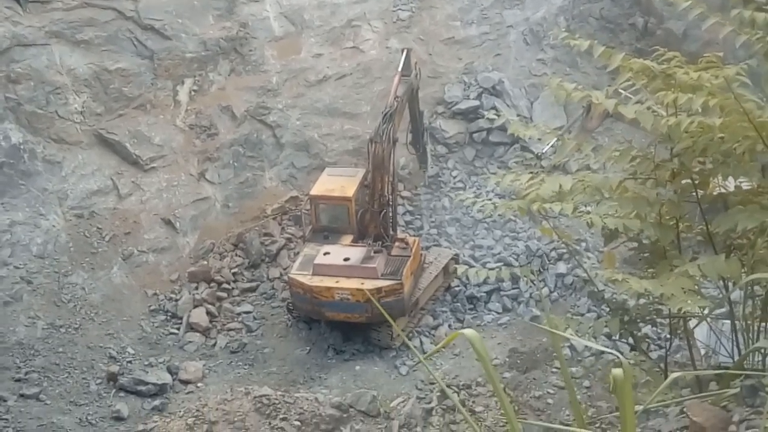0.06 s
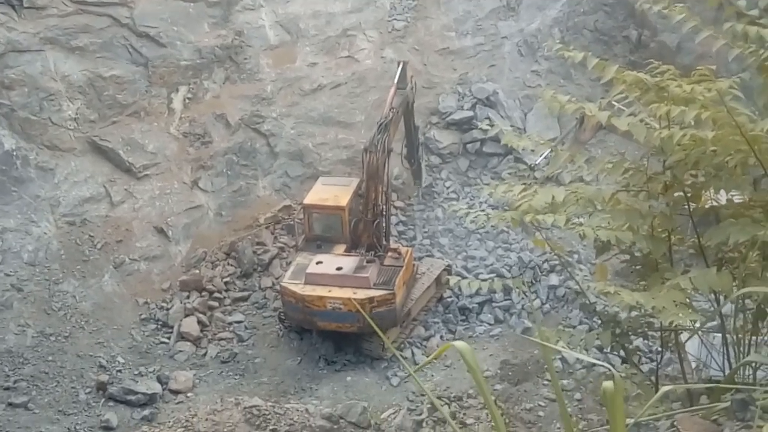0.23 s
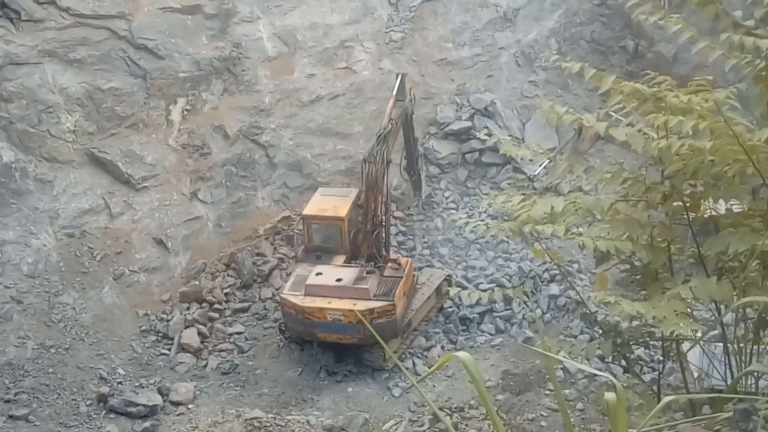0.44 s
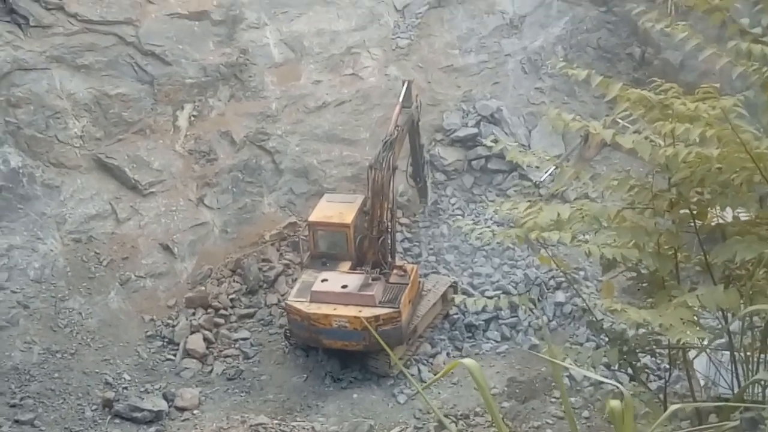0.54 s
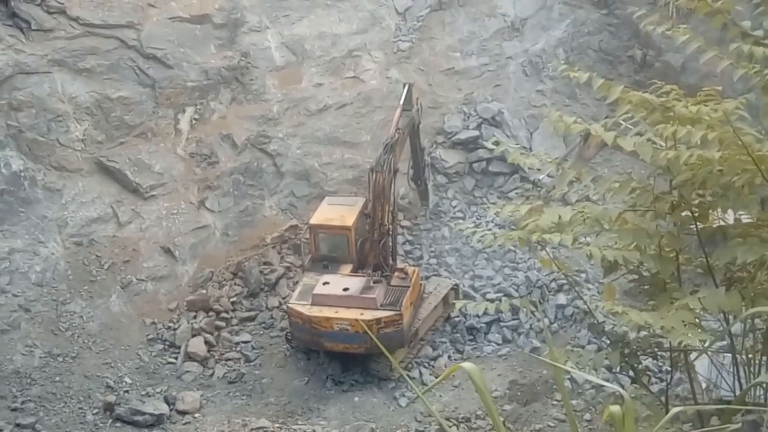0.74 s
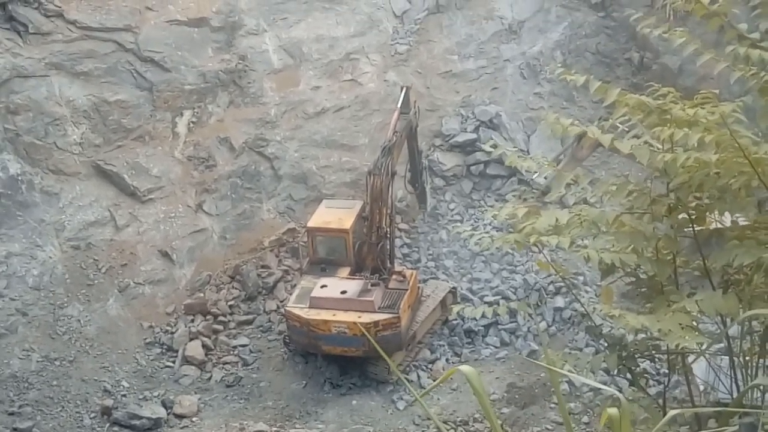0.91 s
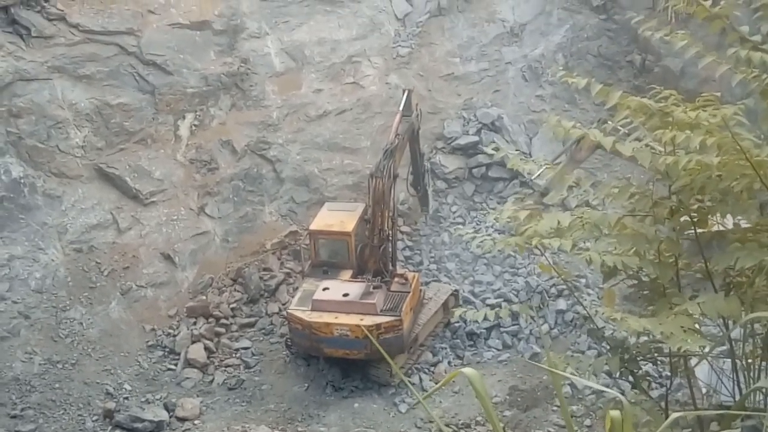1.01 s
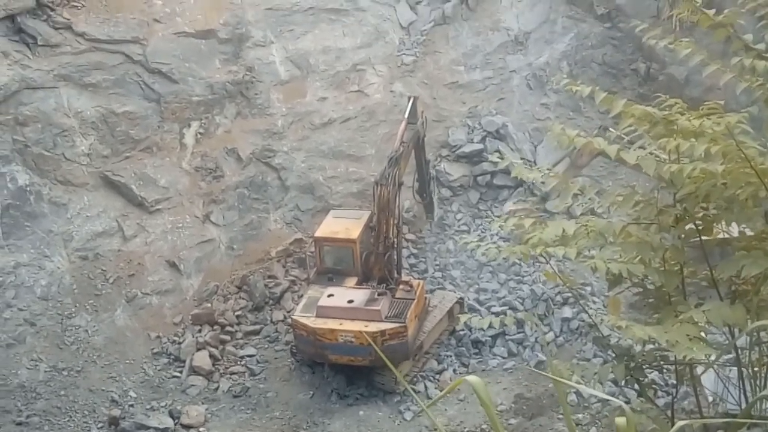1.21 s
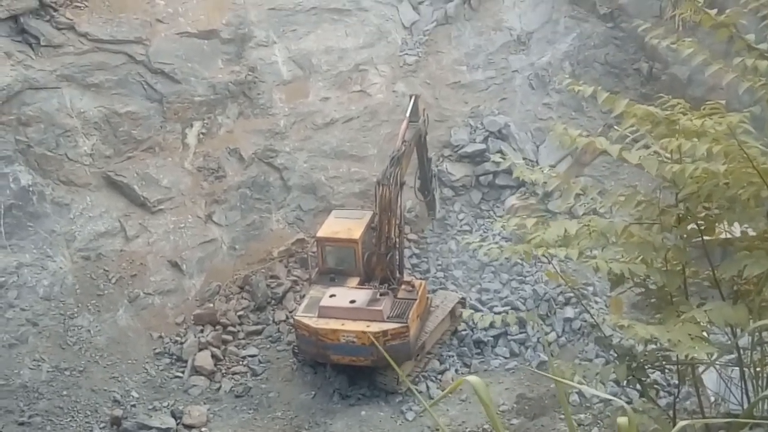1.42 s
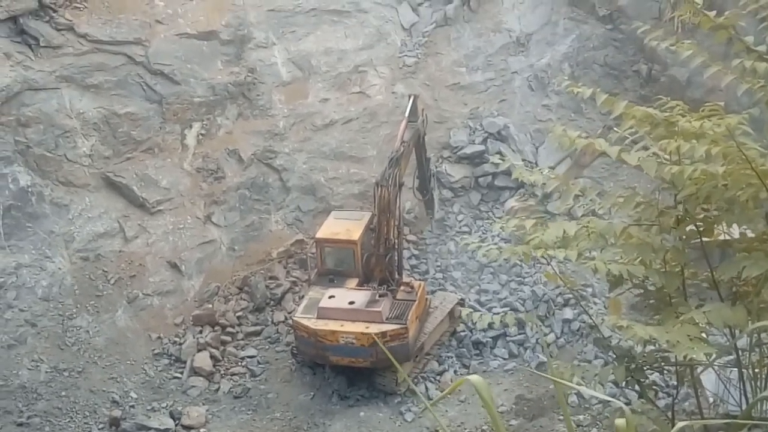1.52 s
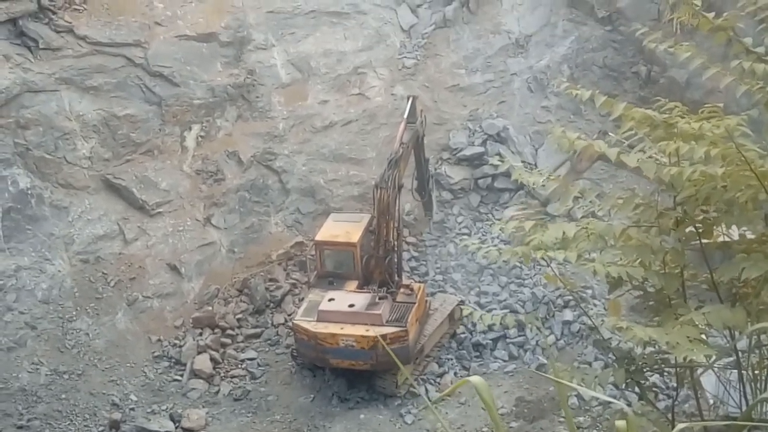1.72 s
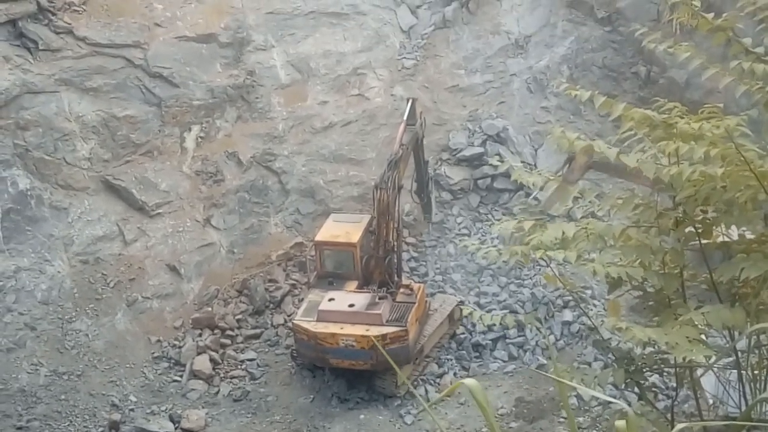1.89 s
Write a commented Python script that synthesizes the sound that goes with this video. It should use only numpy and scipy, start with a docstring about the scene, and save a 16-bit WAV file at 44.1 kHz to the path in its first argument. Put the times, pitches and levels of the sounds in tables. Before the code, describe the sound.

A hydraulic breaker cracks rock with four sharp, ringing metallic blows over a diesel hum.

```python
"""An excavator's hydraulic breaker cracks rock with four blows of its piston on a steel chisel.
Each blow snaps off splinters, clanks the case and leaves the chisel ringing until it is pressed home.
First the chisel knocks and grinds into place. Oil hisses, rubble tumbles and the diesel engine hums.
The quarry's rock faces echo the work, and a limiter briefly turns the sound down at loud peaks."""
import sys
import numpy as np
from scipy import signal
from scipy.fft import rfft, irfft, next_fast_len
from scipy.io import wavfile
from scipy.ndimage import uniform_filter1d, minimum_filter1d, map_coordinates

SR = 44100
rng = np.random.default_rng(int(sys.argv[2]) if len(sys.argv) > 2 else 0)


def unload_audio(sound):
    """Save the sound as a 16-bit wav file, at the path given as the first command line argument."""
    columns = np.transpose(np.atleast_2d(sound))
    # keep every value between -1 and 1, then stretch to whole-number steps
    steps = np.round(np.clip(columns, -1, 1) * 32767)
    wavfile.write(sys.argv[1], SR, steps.astype(np.int16))


N = 85995
T = np.arange(N) / SR

# Levels are relative. A fade is the time a sound takes to drop by 60 dB.
# Engine hum over time: time_s, firing_tone_db, octave_above_db
ENGINE_HUM = [(0, -44, -54), (.16, -43.5, -53), (.32, -49.5, -39.5), (.53, -43, -38.5), (.78, -42.5, -38),
              (1.0, -49.5, -42), (1.22, -46.5, -37.5), (1.5, -37, -36.5), (1.69, -45, -37),
              (1.77, -54.5, -53), (1.95, -42, -48)]
# The tone colour of each noise: pitch_hz, level_db
ENGINE_SPECTRUM = [(20, -38), (32, -37.5), (55, -11), (85, -9.5), (140, -6), (175, -14.5), (212, -41),
                   (290, -7.5), (430, -13.5), (520, -1.5), (700, -4.5), (1350, -6.5), (2200, -16),
                   (4500, -24.5), (6500, -28), (7600, -44.5), (9000, -64), (13000, -60.5), (15500, -57.5)]  # engine and fan noise, with a very faint high hiss on top
RUBBLE_SPECTRUM = [(40, -21.5), (75, -37.5), (150, -1), (210, -33.5), (290, -3.5), (420, -10.5), (700, 1),
                   (1100, -9), (3000, -14.5), (8000, -65)]
OIL_SPECTRUM = [(200, -32), (600, 3.5), (1500, -1.5), (2500, -6), (4200, -3.5), (6500, -10), (8000, -28.5),
                (11000, -42), (16000, -51)]
GRIND_SPECTRUM = [(120, -39.5), (210, -28.5), (300, -18.5), (420, -6), (560, 3.5), (1200, 7), (2300, -5.5),
                  (4000, -9), (6300, -22), (8000, -40.5), (11000, -64.5), (16000, -64.5)]
QUARRY_SPECTRUM = [(120, -13.5), (210, -26), (300, -13.5), (420, -10.5), (560, 3), (1400, -2.5),
                   (2300, -10.5), (3500, -10.5), (6400, -20.5), (8000, -38), (9500, -37), (10500, -52.5),
                   (16000, -53)]  # the rock faces answering a blow
CRACK_SPECTRUM = [(150, -50), (400, -10), (650, -4), (1400, 2), (2300, -11.5), (4500, -10.5), (6500, -20),
                  (8200, -38.5), (12000, -51.5), (16000, -55)]
# How long sound lingers between the rock faces: pitch_hz, fade_s
QUARRY_FADES = [(200, 0.77), (700, 0.47), (1500, 0.7), (3500, 0.72), (7000, 0.82), (14000, 0.26)]
# Loose stones tumble: peak_s, level_db, width_s
TUMBLES = [(0.464, -32, 0.058), (0.747, -26, 0.044), (1.344, -27.5, 0.071), (1.53, -30.5, 0.1)]
# Oil surges into the cylinder just before a blow or knock: start_s, level_db
OIL_SURGES = [(0.293, -35.5), (0.593, -22.5), (0.835, -23), (1.039, -27), (1.234, -19), (1.457, -31)]
# Tones of the breaker's steel case: pitch_hz, level_db, fade_s
CASE_TONES = [(568, -11, 0.22), (638, -18, 0.56), (800, -19, 0.04), (1145, -12, 0.35), (1373, -9.5, 0.14),
              (1460, -9, 0.14), (1670, -9, 0.082), (1935, -15, 0.31)]
# The chisel knocks and grinds on the rock: start_s, level_db, fade_s, treble_db
KNOCKS = [(.2, -31, 0.31, 2), (.3005, -20.5, 0.44, 0.5), (.345, -26.5, 1, 1.5), (0.4025, -18, 0.31, 7),
          (1.481, -20, 0.38, 4.5)]
# The chisel's main tones and its faint top ones: pitch_hz, level_db, fade_multiplier
CHISEL_TONES = [(2998, -8, .44), (3203, 0, 1), (4493, -16, .4), (6057, -10.5, 1.3), (6123, -18, 1)]
CHISEL_TOP_TONES = [(7865, -40, 1.1), (8480, -46, 1.2), (9146, -40, .6), (9604, -43, .5), (11479, -53, 1)]
# The chisel is pressed home after each blow, which stops its ring: time_s
PRESSED_HOME_S = [.69, .9135, 1.1445, 1.527]
# The chisel chatters as it settles: start_s, level_db, pitch_hz
CHATTERS = [(.683, -27, 6150), (.919, -26, 3420), (.928, -26, 3720), (.93, -35, 6280), (1.144, -26, 3400),
            (1.15, -34, 6230), (1.16, -29, 3650)]
# Piston blows: start_s, crack_db, quarry_db, ring_db, ring_treble_db, ring_lowest_tone_db, ring_fade_s
BLOWS = [(.6180, 4.5, -16.5, -11, 1.5, 4, 0.27), (.8585, 4, -16.5, -11, 1.5, -3, 0.78),
         (1.0617, 2.5, -18, -13.5, 3.5, -2.5, 0.83), (1.2550, 6, -16, -11.5, -4, 5, 0.99)]


def amp(db):
    """Turn decibels into a volume multiplier."""
    return 10 ** (np.asarray(db) / 20)


def unit(x):
    """Scale a sound to an average (rms) level of 1."""
    return x / np.sqrt(np.mean(x ** 2) + 1e-20)


def along(points, hz):
    """Read between the rows of a (pitch_hz, value) table, on a musical pitch scale."""
    pitches, values = np.transpose(points)
    return np.interp(np.log(hz + 1), np.log(pitches + 1), values)


def wobble(per_s):
    """A smooth random curve through per_s points a second."""
    return map_coordinates(rng.standard_normal(4096), [T * per_s], mode="wrap")


def filtered(x, gain_at):
    """Turn each frequency of x up or down by gain_at(hz)."""
    size = next_fast_len(N + SR // 2)
    return irfft(rfft(x, size) * gain_at(np.fft.rfftfreq(size, 1 / SR)), size)[:N]


def noise(spectrum, treble_db=0):
    """Noise with the given tone colour and optional extra treble."""
    treble = [(1200, 0), (3500, 1)]
    white = rng.standard_normal(N)
    return unit(filtered(white, lambda hz: amp(along(spectrum, hz) + treble_db * along(treble, hz))))


def gritty(x, depth_db=1):
    """Roughen a noise with fast, small jumps in level."""
    return unit(x * amp(depth_db * wobble(500)))


def strike(start_s, rise_s, fade_s):
    """A loudness curve that jumps up and dies away."""
    age = np.maximum(T - start_s, 0)
    return (1 - np.exp(-age / rise_s)) * amp(-60 * age / fade_s)


def click(spectrum, size=2048):
    """One sharp pulse with the given tone colour and a peak of 1."""
    cepstrum = irfft(np.log(amp(along(spectrum, np.fft.rfftfreq(size, 1 / SR)))))
    # Folding the second half onto the first packs the energy at the pulse's start.
    cepstrum[1:size // 2] *= 2
    cepstrum[size // 2 + 1:] = 0
    pulse = irfft(np.exp(rfft(cepstrum)))
    return pulse / np.abs(pulse).max()


def placed(x, start_s):
    """Delay a sound so that it begins at start_s."""
    return np.pad(x, (round(start_s * SR), N))[:N]


def quarry_fade(x):
    """Each frequency dies away at its own speed between the rock faces."""
    hz, times, bands = signal.stft(x, SR, nperseg=256)
    fade = amp(-60 * times / along(QUARRY_FADES, hz)[:, None])
    return signal.istft(bands * fade, SR, nperseg=256)[1][:N]


def quarry_reverb(x):
    """The rock faces scatter a sound into a blurred tail."""
    tail = quarry_fade(rng.standard_normal(N)) * (1 - np.exp(-T / 0.09))
    return signal.fftconvolve(x, tail / np.linalg.norm(tail))[:N]


def engine(firing_hz=54.06, hum_db=-2.5, noise_db=-35):
    """The diesel hums at its firing rate and an octave up; its noise pulses with the firings."""
    phase = 2 * np.pi * firing_hz * T + 0.45 * wobble(8)
    times, *levels = np.transpose(ENGINE_HUM)
    hum = np.zeros(N)
    for harmonic, db in enumerate(levels, 1):
        loudness = np.sqrt(2) * amp(np.interp(T, times, db) + 0.36 * wobble(12))
        hum += loudness * np.sin(harmonic * (phase + 2 * np.pi * rng.random()))
    clatter_gain = amp(noise_db + .5 * wobble(12))
    clatter = unit(noise(ENGINE_SPECTRUM) * (1 + 0.083 * np.sin(phase)))
    return amp(hum_db) * hum + clatter_gain * clatter


def rubble():
    """Broken stone slides in dull swells."""
    return sum(amp(db) * np.exp(-.5 * ((T - peak_s) / width_s) ** 2) * gritty(noise(RUBBLE_SPECTRUM))
               for peak_s, db, width_s in TUMBLES)


def oil_hiss():
    """Oil hisses briefly as it drives the piston down."""
    return sum(amp(db) * strike(start_s, rise_s=0.0054, fade_s=0.22) * gritty(noise(OIL_SPECTRUM))
               for start_s, db in OIL_SURGES)


def case_clank(start_s):
    """The breaker's steel case clanks, neighbouring tones swinging against each other."""
    age = np.maximum(T - start_s, 0)
    onset = 1 - np.exp(-(age / .0002) ** 2)
    clank = np.zeros(N)
    for k, (hz, db, fade_s) in enumerate(CASE_TONES):
        loudness = amp(db + rng.normal(0, 0.87) - 60 * age / fade_s)
        clank += (-1) ** k * loudness * np.sin(2 * np.pi * hz * age)
    return onset * clank


def chisel_knocks(clank_db=-9):
    """Pressed against the rock, the chisel knocks and grinds without ringing."""
    out = np.zeros(N)
    for start_s, db, fade_s, treble_db in KNOCKS:
        grind = strike(start_s, 0.00067, fade_s) * gritty(noise(GRIND_SPECTRUM, treble_db))
        out += amp(db) * (grind + amp(clank_db) * case_clank(start_s))
    return out


def chisel_ring(stop_fade_s=.025, jitter_s=8e-6, chatter_width_hz=160, reverb_db=-17):
    """The steel rings freely after a blow, then is hushed and chatters as it is pressed home."""
    ring = np.zeros(N)
    for (start_s, _, _, db, treble_db, low_db, fade_s), home_s in zip(BLOWS, PRESSED_HOME_S):
        damping = amp(-60 * np.maximum(T - home_s, 0) / stop_fade_s)
        for hz, tone_db, fade_multiplier in CHISEL_TONES + CHISEL_TOP_TONES:
            colour_db = treble_db * (5000 < hz < 7000) + low_db * (hz < 3100)
            loudness = amp(db + tone_db + colour_db + .8 * wobble(35))
            wavering_time = T + jitter_s * wobble(70)  # the air unsteadies high tones most
            tone = np.sin(2 * np.pi * (hz * wavering_time + rng.random()))
            ring += loudness * damping * strike(start_s, .0007, fade_s * fade_multiplier) * tone
    for start_s, db, hz in CHATTERS:
        chatter = filtered(rng.standard_normal(N), lambda f: 1 / (1 + ((f - hz) / chatter_width_hz) ** 2))
        ring += amp(db) * strike(start_s, rise_s=0.0016, fade_s=0.18) * unit(chatter)
    return ring + amp(reverb_db) * quarry_reverb(ring)


def splinters(start_s, count=6, spread_s=.02):
    """Bits of rock snap off at uneven moments after a crack."""
    snap = click(CRACK_SPECTRUM)
    return sum(amp(1.1 * size) * placed(snap, start_s + .003 + spread_s * abs(late))
               for late, size in rng.standard_normal((count, 2)))


def breaker_blows(burst_db=-14, clank_db=-16.5, kickback_db=-4.5, splinter_db=-14):
    """The rock cracks, the case clanks twice as the chisel kicks back, and the quarry answers."""
    out = np.zeros(N)
    for start_s, crack_db, quarry_db, *_ in BLOWS:
        snap = placed(click(CRACK_SPECTRUM), start_s)
        burst = amp(burst_db) * strike(start_s, rise_s=0.00099, fade_s=0.069) * noise(CRACK_SPECTRUM)
        clank = case_clank(start_s)
        kickback_s = start_s + 0.003873 * (1 + rng.random() / 2)
        clank += amp(kickback_db) * case_clank(kickback_s)
        chips = amp(splinter_db) * splinters(start_s)
        out += amp(crack_db) * (snap + burst + amp(clank_db) * clank + chips)
        answer = quarry_fade(gritty(noise(QUARRY_SPECTRUM))) * (1 - np.exp(-T / .002))
        out += amp(quarry_db) * placed(answer, start_s)
    return out


def scene(echo_delay_s=.17, echo_db=-16.5):
    """Mix everything in mono; the far wall sends the work back late and blurred."""
    work = breaker_blows() + chisel_knocks() + oil_hiss()
    echo = amp(echo_db) * placed(quarry_reverb(work), echo_delay_s)
    return (work + echo + chisel_ring() + rubble() + engine())[None]


def record(dry, ceiling_db=-3.4, look_ahead_s=.007, recovery_db_per_s=112, top_hz=16300):
    """A limiter turns down just before each loud peak and recovers; the highest treble is cut."""
    mono = dry[0]
    excess_db = np.maximum(20 * np.log10(np.abs(mono) + 1e-9) - ceiling_db, 0)
    recovery_db = recovery_db_per_s * T
    cut_db = np.maximum.accumulate(excess_db + recovery_db) - recovery_db
    ahead = round(look_ahead_s * SR)
    gain_db = uniform_filter1d(minimum_filter1d(-cut_db, 2 * ahead), ahead // 2)
    return filtered(mono * amp(gain_db), lambda hz: hz < top_hz)[None]


dry = scene()
out = record(dry)
unload_audio(out)
```